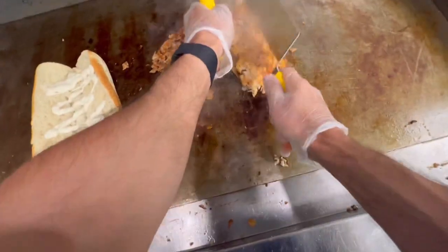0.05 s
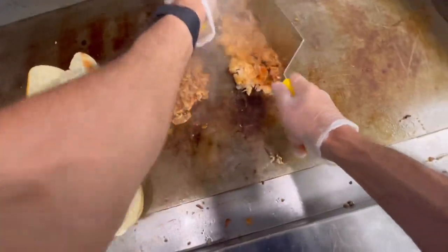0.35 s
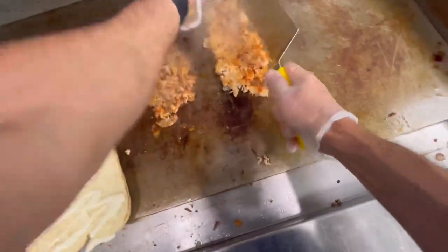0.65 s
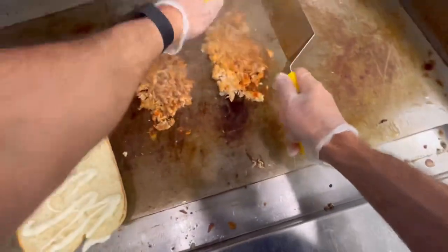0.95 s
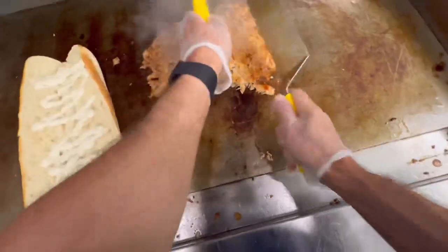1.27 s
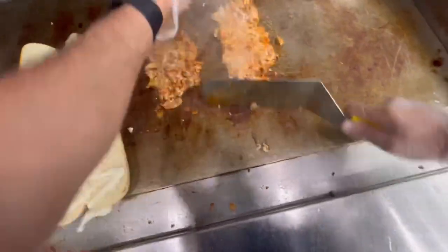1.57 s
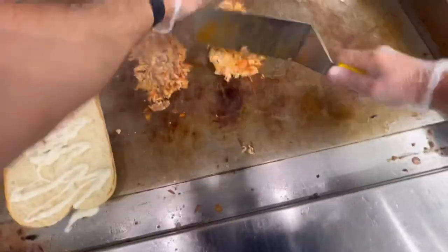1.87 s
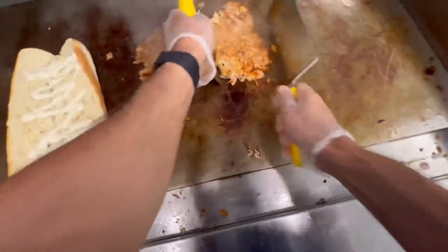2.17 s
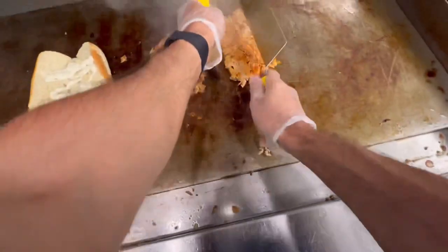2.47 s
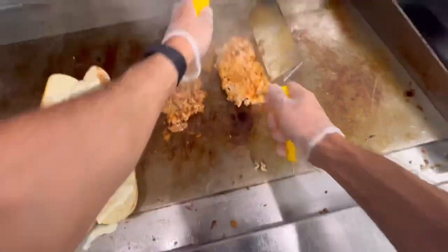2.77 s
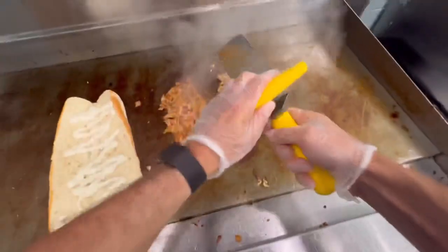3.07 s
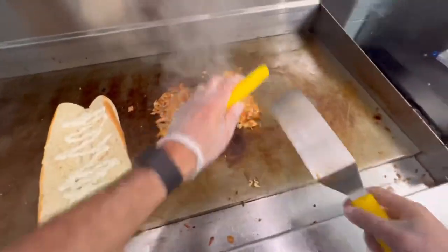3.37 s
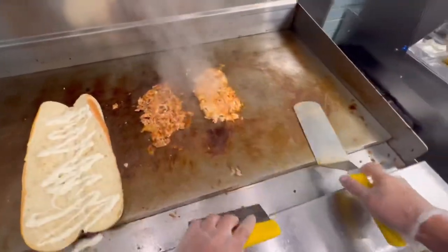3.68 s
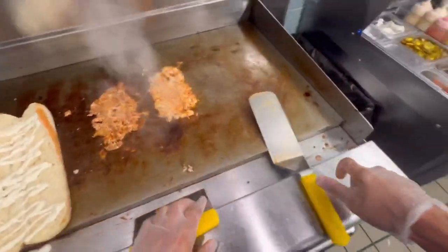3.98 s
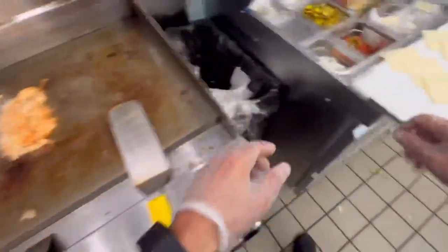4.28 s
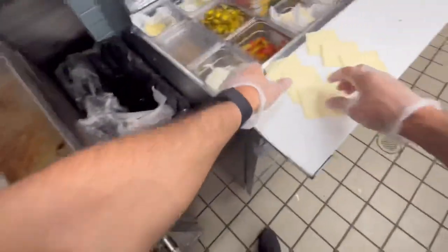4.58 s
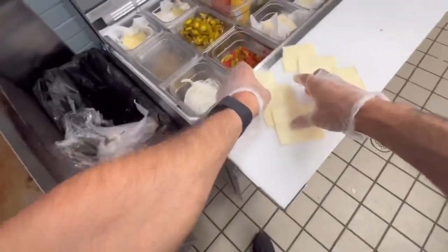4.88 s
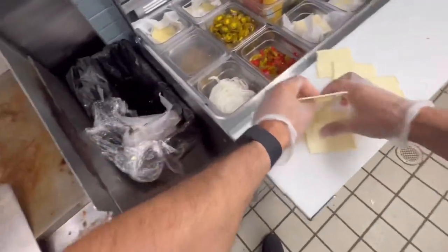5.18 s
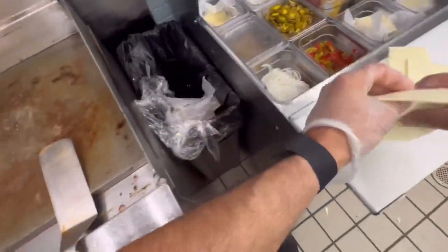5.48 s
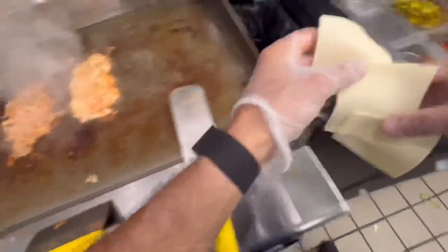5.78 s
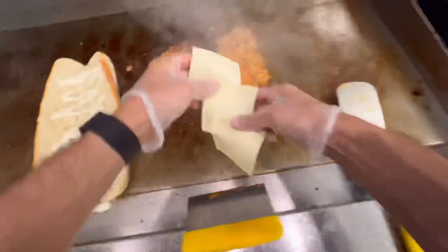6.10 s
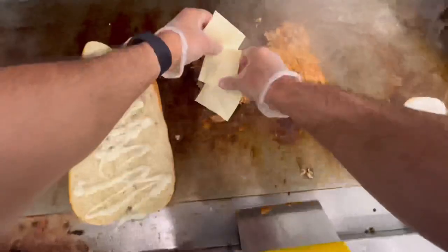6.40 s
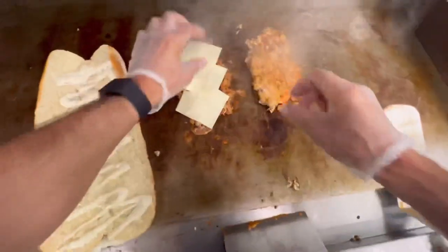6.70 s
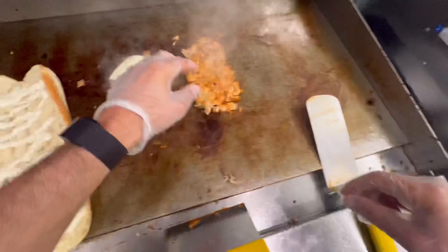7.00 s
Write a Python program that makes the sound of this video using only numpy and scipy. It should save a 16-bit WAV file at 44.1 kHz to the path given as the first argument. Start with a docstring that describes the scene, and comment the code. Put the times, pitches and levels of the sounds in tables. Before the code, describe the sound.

Close up, from the cook's position in a tiled kitchen, metal spatulas click, knock and scrape on a hot griddle while frying meat hisses in flares and ventilation rumbles. The blades are wiped together and set down rocking on steel. Soft glove rustles and one short pan clatter follow, with a low cooler drone behind them, before the frying and the fan rumble grow louder.

```python
"""Meat sizzles on a griddle under a rumbling extractor hood, heard from microphones worn by the cook.
Two steel spatulas clink, chop and scrape, each knock ringing into the tiled kitchen, and the sizzle
flares as wet food meets hot steel. Near 3 s the blades are wiped on each other, then laid rocking on
the steel ledge. The cook turns to a droning chilled counter, gloves rustle and at 5.3 s a pan clatters.
Last, the cook leans back over the griddle, and the hood and the frying swell."""
import sys
import numpy as np
from scipy import signal
from scipy.fft import rfft, irfft, next_fast_len
from scipy.io import wavfile
from scipy.ndimage import map_coordinates

SR = 44100
rng = np.random.default_rng(int(sys.argv[2]) if len(sys.argv) > 2 else 0)


def master_out(mix):
    """Clip the mix to full scale and print it as 16-bit PCM to the path in sys.argv[1]."""
    frames = np.transpose(np.atleast_2d(mix))
    ceiling = np.clip(frames, -1, 1)
    pcm = np.round(ceiling * 32767).astype(np.int16)
    wavfile.write(sys.argv[1], SR, pcm)


N = 319725

# Hits. Each row: start in seconds, relative level in dB, low-end weight in dB, bright edge in dB,
# clash decay (t60) in seconds, favoured mode in Hz, ring in dB.
BLADE_CLINKS = [ (.5185, -17, -2.5, -0.5, 0.055, 1840, -1.5), (.7740, -19.5, 0.5, 1, 0.1, 1055, -4.5),
                (1.0435, -17.5, -1.5, -1.5, 0.087, 2800, -3.5), (1.0550, -19, -4, -18, 0.072, 2025, -0.5),
                (3.0490, -25, -21, -7, 0.15, 1690, -2), (3.0555, -14.5, -3, -3, 0.13, 1690, -3.5),
                (3.1690, -28.5, 3, -2, 0.15, 1055, -1), (3.2080, -30, 4, 10, 0.11, 2790, -5),
                (3.2420, -31.5, -8, 1, 0.12, 1690, -2)]  # blade against blade
CLEANING_TAPS = [(1.5315, -16.5, 0.5, 0, 0.097, 1455, -2.4)]  # a spatula tapped clean and lifted, so it rings on
GRIDDLE_CHOPS = [ (1.2025, -29.5, -3, -4, 0.043, 3521, 3), (1.2220, -12.5, -0.5, -7, 0.051, 4716, 2.5),
                 (2.0980, -22, -4, -9, 0.061, 3521, -5), (2.1120, -23, 5, -3.5, 0.062, 3521, -8),
                 (2.1535, -26.5, 0, -26, 0.063, 1044, -2), (2.4070, -20, 10, -8, 0.063, 1044, -10),
                 (2.5228, -8.5, -4, -10, 0.038, 1044, -5.5)]  # a blade coming down on the griddle
LEDGE_LANDINGS = [ (3.5420, -33.5, 10, 5.5, 0.054, 880, 1.5), (3.5788, -29, 4, -8, 0.056, 1916, -1),
                  (3.6300, -28, 6, -3, 0.059, 1305, -3), (3.6420, -30, 4, -4, 0.062, 1771, 0),
                  (3.6900, -24, 6, -6.5, 0.05, 753, -1), (3.7200, -25, 7, -6.5, 0.053, 1650, 3),
                  (3.7590, -28.5, 10, -4, 0.049, 603, 5.5), (3.7720, -29.5, 11, -11, 0.05, 463, 4.5),
                  (3.8610, -24.5, -0.5, -19, 0.05, 2310, 4), (3.9170, -28.5, 5.5, -20, 0.054, 2260, 3.5),
                  (3.9830, -42, 11, -20, 0.04, 1305, 3)]  # spatulas landing and rocking on the ledge
PAN_HITS = [ (5.3030, -39, -1, -4, 0.24, 1335, -2), (5.3245, -26, 6, -1, 0.091, 1335, 3),
            (5.3300, -16, -4, -3, 0.044, 825, 3), (5.3335, -8.5, -6, -12, 0.023, 1486, -4),
            (5.3490, -20, -5, -16, 0.062, 1260, 9), (5.3540, -19, -4, -16, 0.051, 1486, -3),
            (5.3650, -21, 6.5, -3, 0.05, 1175, -1), (5.3760, -18.5, -1, -16, 0.041, 1260, 2),
            (5.4010, -26.5, -2, -8, 0.066, 958, -1)]  # a food pan on the counter
# Ringing steel. Each row: mode frequency in Hz, relative level in dB, decay (t60) in seconds.
HELD_BLADE_MODES = [(810, -3, 0.2), (1055, 0, 0.14), (1690, 4, 0.1), (1840, 3, 0.09), (2025, 1, 0.27),
                    (2290, 2, 0.08), (2700, 5, 0.08), (2880, 7, 0.09), (3850, -5, 0.24), (5080, 1, 0.13),
                    (5720, 3, 0.15), (6500, 1, 0.15), (8150, 3, 0.2), (9050, 4, 0.2), (9520, 4, 0.13),
                    (10080, 7, 0.13)]  # one blade held against the other
FREE_BLADE_MODES = [(1357, -4, 0.32), (1455, 2, 0.1), (2035, 3, 0.42), (2320, -1, 0.35), (2487, 2, 0.25),
                    (2720, 2, 0.12), (3208, -3, 0.3), (3510, 2, 0.17), (3865, -2, 0.37), (4226, -7, 0.45),
                    (4355, -6, 0.33), (4705, -5, 0.48), (4996, 4, 0.22), (5780, 5, 0.12), (6510, 0, 0.2),
                    (7348, 0, 0.3), (8145, 4, 0.35), (8608, 0, 0.3)]
PLANTED_BLADE_MODES = [(1044, 1, 0.25), (1416, -2, 0.45), (1470, 4, 0.11), (1525, 4, 0.12), (1610, 4, 0.08),
                       (2040, 1, 0.18), (2370, 2, 0.09), (2690, 2, 0.11), (2875, 6, 0.13), (3080, 1, 0.09),
                       (3230, -1, 0.17), (3521, 4, 0.16), (3795, 2, 0.11), (4221, 3, 0.14), (4716, -8, 0.5),
                       (4985, -4, 0.2)]  # edge down on the griddle
LEDGE_MODES = [(463, 3, 0.13), (753, -2, 0.16), (880, -2, 0.15), (1650, 3, 0.25), (1916, -3, 0.2),
               (2719, -6, 0.25), (3252, -5, 0.28), (5080, -4, 0.2), (603, 2, 0.4), (1136, -1, 0.2),
               (1305, 2, 0.4), (1362, 1, 0.42), (1771, 1, 0.34), (2159, -2, 0.38), (2353, -2, 0.33),
               (2455, -5, 0.28)]  # sheet steel with a spatula on it
PAN_MODES = [(825, 5, 0.17), (958, 4, 0.2), (1075, 3, 0.15), (1175, 5, 0.13), (1260, 6, 0.16),
             (1335, 4, 0.11), (1486, 4, 0.13), (1570, 0, 0.2), (1885, -1, 0.27), (2100, -4, 0.28),
             (2440, 0, 0.14), (2900, -2, 0.2), (3230, -1, 0.2), (4300, -5, 0.17), (5050, -3, 0.22),
             (5170, 0, 0.2)]
# Steel sliding on steel. Each row: peak time, rise and fall in seconds, relative level, bright edge
# and top end in dB, judder pitch in Hz, judder level in dB.
SCRAPES = [ (0.829, 0.069, 0.11, -37, -15, -6, 870, -17), (1.63, 0.093, 0.064, -40, -6, 0, 2300, -5),
           (2.425, 0.029, 0.11, -28, -5.5, -48, 521, 5.5), (3.136, 0.092, 0.19, -48, 9, 10, 5900, -10),
           (3.193, 0.051, 0.055, -26.5, 1.5, 3, 2280, -1), (3.628, 0.079, 0.094, -35, -16.5, -26, 1805, 0),
           (3.724, 0.042, 0.097, -34, -8, -15, 338, 0.5)]
# Heavy pushes on the steel top. Each row: start in seconds, level in dB.
PUSHES = [(2.41, -21.5), (3.621, -23.5)]
# Gloves on the counter and the cheese. Each row: peak time in seconds, level in dB, rise in seconds.
GLOVE_RUBS = [(4.363, -26.5, 0.042), (4.776, -29.5, 0.041), (5.873, -35, 0.0067), (6.80, -36.5, .018)]
# Wet food meets hot steel. Each row: peak time and rise in seconds, extra steam as a multiple of the
# steady flow, sputter level in dB.
STEAM_FLARES = [(0.0, 0.032, 3, -41), (.47, 0.5, 1.9, -58), (1.68, .16, 1.44, -45),
                (2.62, 0.071, 0.33, -51), (3.9, 0.56, 0.7, -75), (6.78, 2, 1.1, -44)]
# Tone curves of the frying and the hood. Each row: frequency in Hz, relative level in dB.
FRY_EQ = [(500, -37), (1300, -3), (2500, -0.5), (4000, -2.5), (6000, 1.5), (9000, 4.5), (10500, -2.5),
          (13000, -42), (16000, -30)]
SPRAY_EQ = [(7000, -30), (10000, -50), (11500, 8), (13000, 6.5), (15600, 1), (16500, -25)]
SPUTTER_EQ = [(600, -20), (1200, -10), (2100, -9), (2600, -12), (3600, -18), (8000, -31)]
RUMBLE_EQ = [(12, -56), (20, -37), (64, -3), (108, 2.5), (129, 1), (157, -10), (188, -4), (226, -32.5),
             (260, -13), (340, -73), (570, -120)]
AIR_EQ = [(120, -75), (230, 3), (280, 2.5), (410, 2), (510, -2.5), (660, -9.5), (1000, -11), (1400, -17),
          (2400, -21.5), (5000, -23.5), (16000, -60)]
# The hood's hum and duct resonances. Each row: frequency in Hz, width in Hz, relative level in dB.
DUCT_MODES = [(122.7, 21, -5), (174, 6.6, -11), (197.7, 9.4, -11), (255.1, 13, -18.5), (347.4, 16, -19.5),
              (402.6, 9, -12.5), (504, 10, -20), (704, 9.3, -35.5), (964, 21, -24), (1039, 12, -27)]
# The hood is louder as the cook leans under it. Each row: time in seconds, relative level in dB.
HOOD_RIDE = [(0.0, -32.5), (1.37, -29.5), (1.77, -31), (2.54, -28.5), (3.01, -28.5), (3.86, -27.5),
             (4.1, -30.5), (5.17, -32), (6.58, -23), (7.25, -25.5)]
# The cook's turn. Each row: time in seconds, direction from 0 (facing the griddle) to 1 (facing away).
COOK_TURN = [(4.15, 0), (4.65, 0.81), (5.2, 0.65), (5.85, 0.028)]
# The tiled kitchen's reverb. Each row: frequency in Hz, decay (t60) in seconds.
ROOM_DECAY = [(300, 0.62), (1000, 0.59), (2500, 0.37), (6000, 0.48), (10000, 0.35), (15000, 0.04)]
# Stereo image of diffuse sound. Each row: frequency in Hz, left-right correlation from -1 to 1.
STEREO_LIKENESS = [(30, 0.92), (70, 0.99), (130, 0.97), (290, 0.75), (640, -0.057), (1400, 0.13),
                   (3000, -0.0042), (9000, -0.043), (14000, -0.099)]
# Colour of the microphone ports. Each row: centre and width in Hz, left and right gain in dB.
PORT_EQ = [(5385, 73, -27, -9), (5360, 1080, 4.5, -4), (7600, 203, -7.5, -40.5)]

REFERENCE_T60_S = 0.11  # ring, reverb and pitch waver are scaled against this decay


def knocks(hits, modes, room_db, top_db):
    """Steel hits: a crack, the clash of two surfaces, ring and room. Held-down steel hardly rings."""
    out, t = np.zeros((2, N)), np.arange(SR) / SR
    for start, db, weight_db, edge_db, t60, struck_hz, ring_db in hits:
        crack = amp(-0.5 - 60 * t / 0.0056) * rng.standard_normal(SR)
        steel = 0.78 * clang(count=120) + 0.4 * spread(rng.standard_normal((2, SR)))
        clash = amp(-60 * t / t60) * steel
        tones = amp(ring_db) * ring(modes, struck_hz, scatter_db=1, favour_db=7)
        room = amp(room_db) * spread(excite(room_tail(), clash))
        attack = 1 - np.exp(-t / 0.00023)
        hit = crack + attack * (clash + t60 / REFERENCE_T60_S * (tones + room))
        snap_db = top_db + edge_db + 0.74 * (db + 18)  # harder hit, shorter contact, more top end
        add(out, start, amp(db + 6) * contact_colour(hit, weight_db, edge_db, snap_db))
    return out


def scrapes():
    """Sliding steel catches and slips in grains, judders at one resonance and sets the blade ringing."""
    out, t = np.zeros((2, N)), np.arange(SR) / SR
    for peak, rise, fall, db, edge_db, top_db, judder_hz, judder_db in SCRAPES:
        pressure = press(rise, fall)
        slips = pressure * amp(2 * wobble(105)[:SR]) * grains(SR, per_second=1800, scatter_db=4)
        choked = clang(count=56) * amp(-60 * t / 0.05)  # pressed steel rings only briefly
        rasp = 0.6 * slips + 0.7 * excite(slips, choked)
        blade = ring(HELD_BLADE_MODES, judder_hz, scatter_db=3, favour_db=5) * amp(-60 * t / 0.25)
        scrape = spread(rasp + amp(-13) * excite(slips, blade) + amp(-19.5) * excite(slips, room_tail()))
        stick_slip_hz = judder_hz * (1 + 0.046 * wobble(348)[:SR])
        judder = amp(judder_db + 5) * pressure * np.sin(2 * np.pi * np.cumsum(stick_slip_hz) / SR)
        weight_db = 1 - 0.52 * edge_db  # a flatter blade trades edge for body
        stroke = amp(12) * contact_colour(scrape, weight_db, edge_db, top_db) + judder
        add(out, peak - 2 * rise, amp(db) * stroke)
    return out


def ring(modes, struck_hz, scatter_db, favour_db):
    """Ringing modes: the contact point favours those near struck_hz, the shifting grip makes them waver."""
    t = np.arange(SR // 2) / SR
    hz, db, t60 = np.transpose(modes)
    favoured = np.exp(-(np.log(hz / struck_hz) / 0.031) ** 2)
    gains = amp(db + favour_db * favoured + scatter_db * rng.standard_normal(len(hz)))
    # each microphone catches a mode at its own phase
    phase = 2 * np.pi * rng.random(len(hz)) + 1.26 * rng.standard_normal((2, len(hz)))
    weights = gains / np.linalg.norm(gains) * np.exp(1j * phase)
    depth_hz = 30 * np.sqrt(REFERENCE_T60_S / t60[:, None])  # long-ringing modes are steadier
    waver_hz = depth_hz * rng.standard_normal((len(hz), 150))[:, (300 * t).astype(int)]
    cycles = np.cumsum(hz[:, None] + waver_hz, axis=1) / SR
    tones = (weights @ np.exp(2j * np.pi * cycles - np.log(1000) * t / t60[:, None])).real
    return np.pad(tones, ((0, 0), (0, SR - len(t))))


def clang(count):
    """Crowded overtones of a pressed steel sheet, rms 1; every grip and contact point shifts them anew."""
    hz = np.linspace(500, 16000, count) + 110 * rng.standard_normal(count)
    phase = 2 * np.pi * rng.random(count) + 1.15 * rng.standard_normal((2, count))
    gains = amp(2.5 * rng.standard_normal(count))
    spectrum = np.zeros((2, SR // 2 + 1), complex)
    spectrum[:, np.clip(hz, 200, SR / 2).astype(int)] = gains * np.exp(1j * phase)
    return unit(irfft(spectrum, SR))


def contact_colour(x, weight_db, edge_db, top_db):
    """Contact EQ: flat, heavy contacts are dull; a blade's edge is bright."""
    eq = [(120, weight_db - 2), (400, weight_db - 0.5), (900, weight_db), (1600, 1), (2800, 1),
          (4200, edge_db / 2 - 1.5), (6500, edge_db), (9500, edge_db),
          (12500, top_db), (16000, top_db - 3.5)]
    return filtered(x, lambda hz: amp(along(eq, hz)))


def press(rise, fall):
    """Contact pressure: peaks at twice the rise, 20 dB down one rise before and one fall after."""
    t = np.arange(SR) / SR
    return amp(-20 * np.maximum(2 - t / rise, (t - 2 * rise) / fall))


def thuds():
    """The wide steel top flexes under a push and booms briefly."""
    out, t = np.zeros((2, N)), np.arange(SR) / SR
    boom_eq = [(15, -20), (35, -14), (55, 16), (120, -12), (300, 5.5), (700, -40)]
    attack = 1 - np.exp(-t / 0.02)
    for start, db in PUSHES:
        boom = field(rng.standard_normal((2, SR)), boom_eq)
        add(out, start, amp(db - 60 * t / 0.49) * attack * boom)
    return out


def rustles():
    """Soft glove friction: fine grains and the room, with nothing to ring."""
    out = np.zeros((2, N))
    for peak, db, rise in GLOVE_RUBS:
        rub = press(rise, fall=2.25 * rise) * grains(SR, per_second=5300, scatter_db=13)
        heard = spread(rub + amp(-0.5) * excite(rub, room_tail()))
        add(out, peak - 2 * rise, amp(db) * contact_colour(heard, weight_db=6, edge_db=-9.5, top_db=-27))
    return out


def sizzle():
    """Frying and fine spray: louder and brighter with more steam, shadowed when the cook turns away."""
    away = automation(COOK_TURN)
    extra_steam = sum(steam * flare(peak, rise) for peak, rise, steam, _ in STEAM_FLARES)
    steam_db = 10 * np.log10(1 + extra_steam)
    boil_db = 0.5 * wobble(8.2)
    fry = amp(-42 + steam_db - 3.5 * away + boil_db) * field(bubbles(), FRY_EQ)
    spray = amp(-49 + 1.26 * steam_db - 8.5 * away + boil_db) * field(bubbles(), SPRAY_EQ)
    return fry + spray


def bubbles():
    """Countless steam bubbles burst in the fat; a few nearer ones crackle out of the hiss."""
    hiss = grains(N, per_second=14000, scatter_db=-4)
    crackle = grains(N, per_second=300, scatter_db=20)
    return hiss + amp(-14) * crackle


def sputter():
    """In each flare larger, wetter bubbles pop lower than the hiss and in clumps."""
    wetness = sum(amp(db) * flare(peak, rise) for peak, rise, _, db in STEAM_FLARES)
    clumps = amp(1.1 * wobble(11))
    return wetness * clumps * field(grains(N, per_second=1000, scatter_db=3.5), SPUTTER_EQ)


def flare(peak, rise):
    """Steam swells to 1 at the peak time and dies away; a slow flare also lasts longer."""
    t = np.arange(N) / SR - peak
    fall = 0.21 + rise  # seconds to sink 20 dB
    return amp(-20 * np.maximum(-t / rise, t / fall))


def hood():
    """Fan rumble with duct resonances, and air rushing through the filters."""
    def ducts(f):
        return sum(amp(db) / np.sqrt(width) * resonance(f, hz, width) ** 2 for hz, width, db in DUCT_MODES)

    ride_db = automation(HOOD_RIDE)
    swing_db = ride_db - ride_db.mean()
    rumble_db = ride_db.mean() + 0.5 + 0.86 * swing_db
    air_db = -36.5 + 0.58 * swing_db  # the rush fills the room, so leaning in changes it less
    rumble = field(rng.standard_normal((2, N)), RUMBLE_EQ)
    hum = unit(filtered(spread(rng.standard_normal((2, N))), ducts))
    air = field(rng.standard_normal((2, N)), AIR_EQ)
    return amp(rumble_db) * rumble + amp(ride_db - 4) * hum + amp(air_db) * air


def cooler():
    """A narrow drone from the chilled counter comes up as the cook turns to it."""
    noise = spread(rng.standard_normal((2, N)))
    drone = filtered(noise, lambda hz: resonance(hz, centre_hz=274.4, width_hz=21) ** 2)
    return amp(-36.5) * automation(COOK_TURN) * unit(drone)


def room_tail():
    """One second of kitchen reverb; each frequency dies at its own speed."""
    hz, t, spectra = signal.stft(rng.standard_normal((2, SR)), SR, nperseg=256)
    decay = amp(-60 * t / along(ROOM_DECAY, hz)[:, None])
    tail = signal.istft(spectra * decay, SR, nperseg=256)[1][:, :SR]
    return tail * (1 - np.exp(-np.arange(SR) / SR / 0.0014))


def spread(pair):
    """Two unrelated signals become a diffuse field: alike in the bass, wide in the treble."""
    def mid_side(hz):
        angle = np.arccos(np.clip(along(STEREO_LIKENESS, hz), -1, 1)) / 2
        return np.array([np.cos(angle), np.sin(angle)])

    mid, side = filtered(pair, mid_side)
    return np.array([mid + side, mid - side])


def field(pair, eq):
    """A diffuse bed with the given tone curve, rms 1."""
    return unit(filtered(spread(pair), lambda hz: amp(along(eq, hz))))


def grains(n, per_second, scatter_db):
    """Tiny random clicks of scattered size on two channels, rms 1."""
    scatter = np.minimum(rng.standard_normal((2, n)), 2)
    sizes = rng.choice([-1, 1], (2, n)) * amp(scatter_db * scatter)
    return unit(sizes * (rng.random(n) < per_second / SR))


def excite(force, tail):
    """Play a force through an impulse response scaled to unit energy."""
    return signal.fftconvolve(force, tail / np.linalg.norm(tail[0]), axes=1)[:, :SR]


def resonance(hz, centre_hz, width_hz):
    """Response of one damped mode."""
    return 1j * hz * width_hz / (centre_hz ** 2 - hz ** 2 + 1j * hz * width_hz)


def filtered(x, response):
    """Shape x with a gain given as a function of frequency."""
    n = x.shape[-1]
    padded = next_fast_len(n + 4096)
    return irfft(rfft(x, padded) * response(np.fft.rfftfreq(padded, 1 / SR)), padded)[..., :n]


def wobble(rate):
    """Smooth random modulation with rate knots a second."""
    knots = rng.standard_normal(int(N * rate / SR) + 4)
    return map_coordinates(knots, [np.arange(N) * rate / SR])


def automation(points):
    """Ramp through (seconds, value) points, one value a sample."""
    return np.interp(np.arange(N) / SR, *np.transpose(points))


def along(points, hz):
    """Read (Hz, value) points on a log frequency axis."""
    point_hz, values = np.transpose(points)
    return np.interp(np.log(hz + 1), np.log(point_hz + 1), values)


def add(track, seconds, x):
    """Mix x into the track from the given time on."""
    start = max(round(seconds * SR), 0)
    track[:, start:start + x.shape[1]] += x[:, :max(N - start, 0)]


def amp(db):
    """Decibels to gain."""
    return 10 ** (np.asarray(db) / 20)


def unit(x):
    """Scale to rms 1."""
    return x / np.sqrt(np.mean(x ** 2) + 1e-20)


def scene():
    """Steel and hands up front, over a bed of frying, hood and cooler."""
    clinks = knocks(BLADE_CLINKS, HELD_BLADE_MODES, room_db=-12.5, top_db=-0.5)
    taps = knocks(CLEANING_TAPS, FREE_BLADE_MODES, room_db=-11.5, top_db=-11)
    chops = knocks(GRIDDLE_CHOPS, PLANTED_BLADE_MODES, room_db=-6, top_db=-7)
    landings = knocks(LEDGE_LANDINGS, LEDGE_MODES, room_db=0.5, top_db=6)
    left_tilt = amp([[1.2], [-1.2]])
    pan = left_tilt * knocks(PAN_HITS, PAN_MODES, room_db=0.5, top_db=-29)
    steel = clinks + taps + chops + landings + scrapes() + thuds() + pan
    return steel + rustles() + sizzle() + sputter() + hood() + cooler()


def record(dry):
    """The worn microphones: ports notch the treble, the top end is shared, peaks are softly clipped."""
    shared_hz, opposed_hz, in_phase_hz, limit_hz = 10300, 10950, 13500, 16100
    sides = np.array([[1], [-1]])
    left_bias = [(100, 0.27), (500, 0.14), (1200, 1), (2400, 0.46), (4200, 1), (9000, 0.2), (13000, 0)]

    def ports(f):
        dips_db = sum(np.array([[left], [right]]) * np.exp(-((f - hz) / width) ** 2)
                      for hz, width, left, right in PORT_EQ)
        return amp(dips_db + sides * along(left_bias, f))

    def phase_twist(f):
        return np.exp(0.5j * np.pi * sides * (f - in_phase_hz) / (in_phase_hz - opposed_hz))

    apart = filtered(dry, lambda f: (f < shared_hz) * ports(f))
    shared = filtered(dry[0], lambda f: (f >= shared_hz) * phase_twist(f))  # left feeds both sides
    heard = apart + shared
    rounded = heard / (1 + np.abs(heard / 0.9) ** 6) ** (1 / 6)
    return filtered(rounded, lambda f: f < limit_hz)


dry = scene()
out = record(dry)
master_out(out)
```